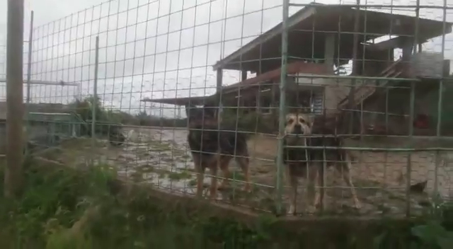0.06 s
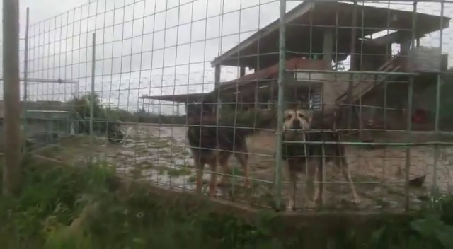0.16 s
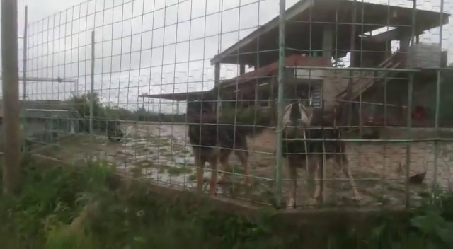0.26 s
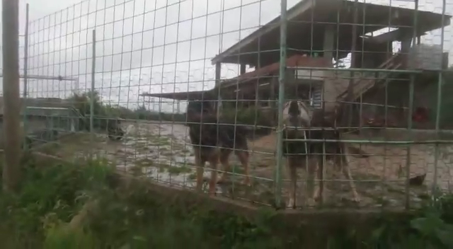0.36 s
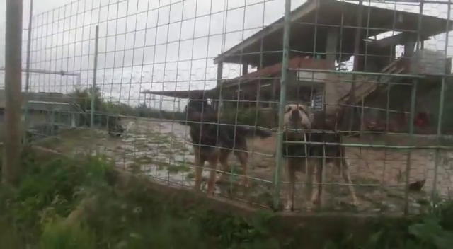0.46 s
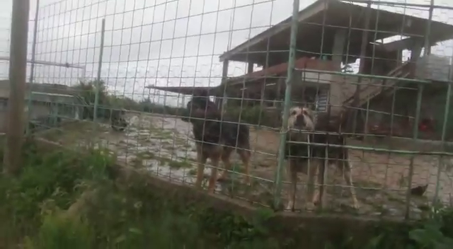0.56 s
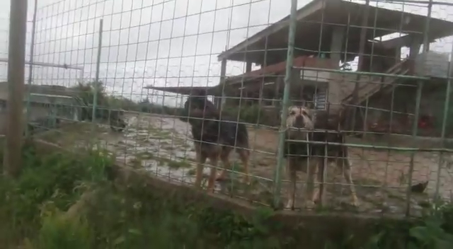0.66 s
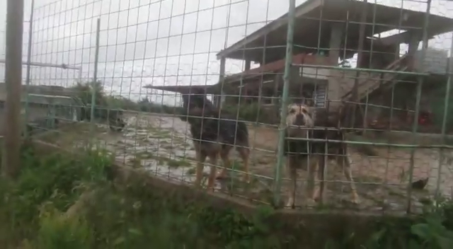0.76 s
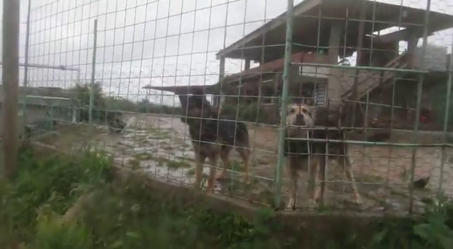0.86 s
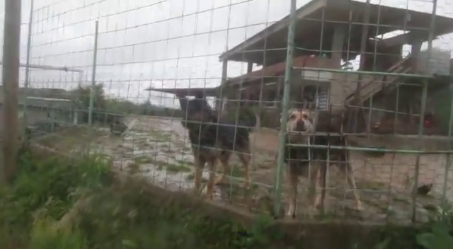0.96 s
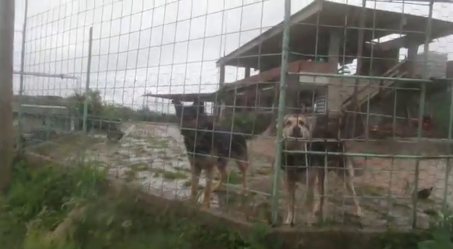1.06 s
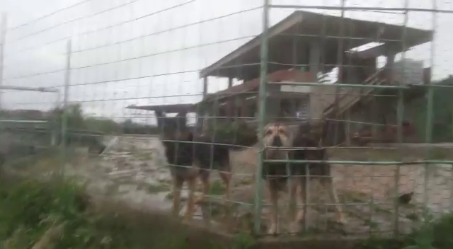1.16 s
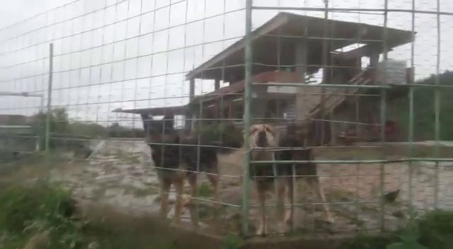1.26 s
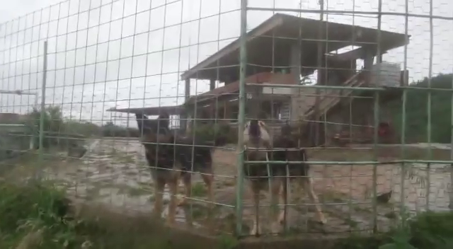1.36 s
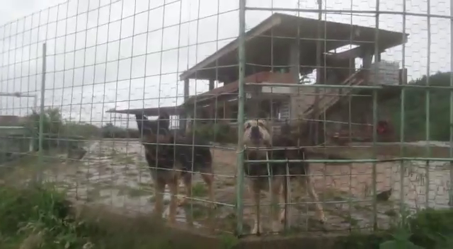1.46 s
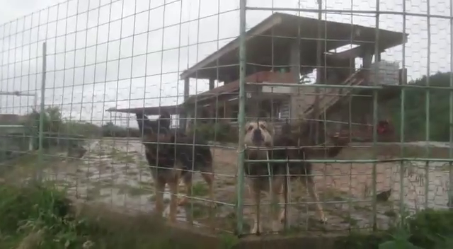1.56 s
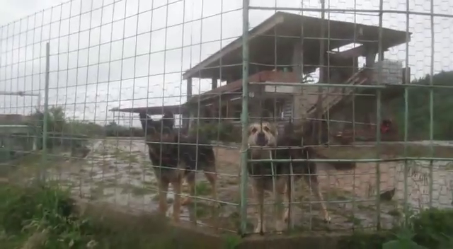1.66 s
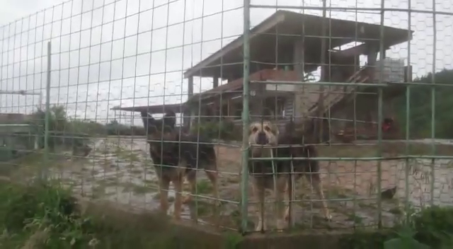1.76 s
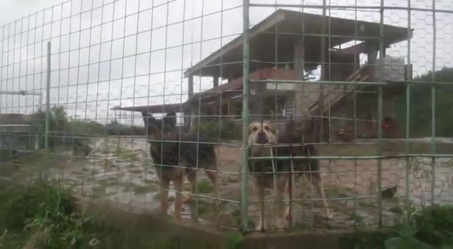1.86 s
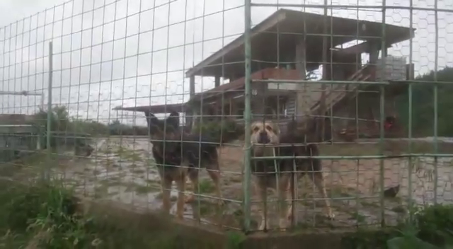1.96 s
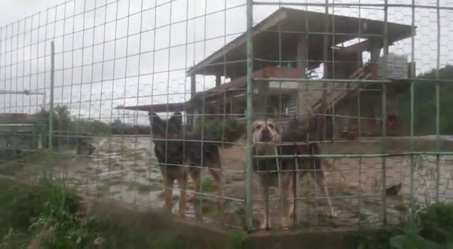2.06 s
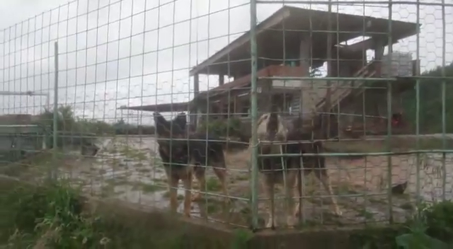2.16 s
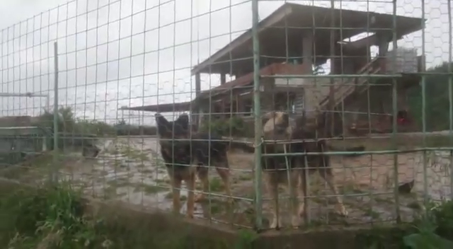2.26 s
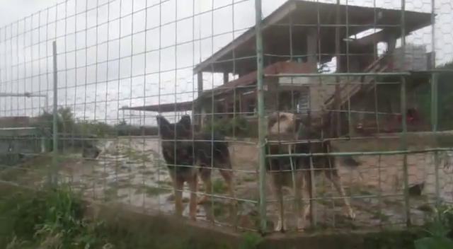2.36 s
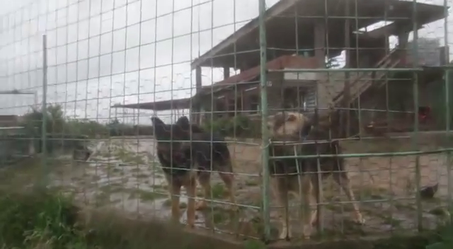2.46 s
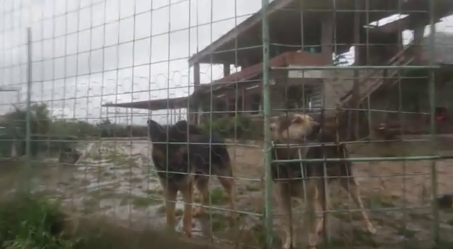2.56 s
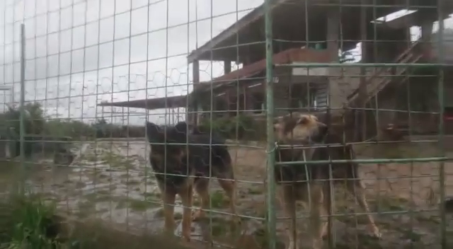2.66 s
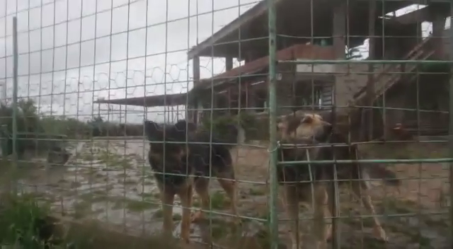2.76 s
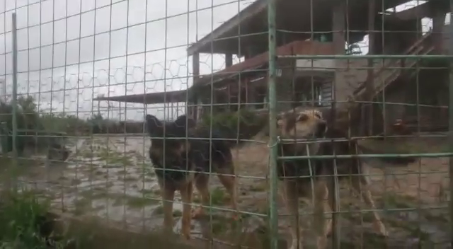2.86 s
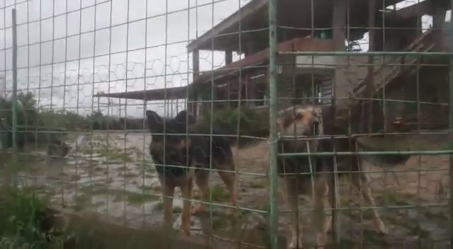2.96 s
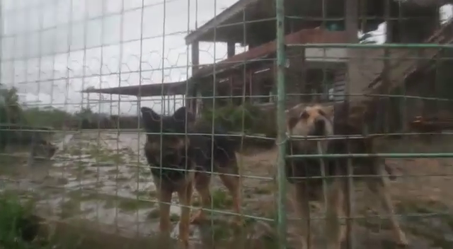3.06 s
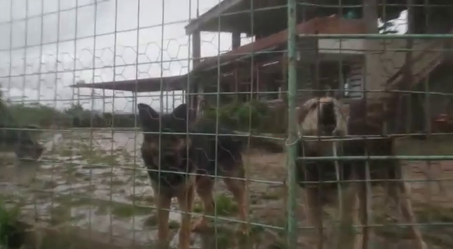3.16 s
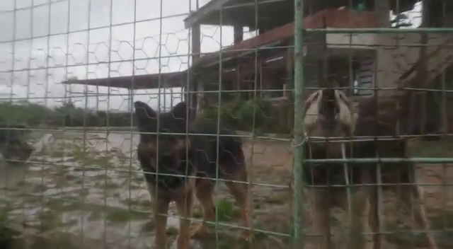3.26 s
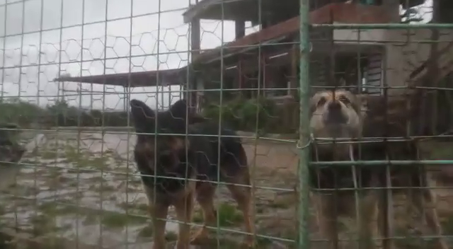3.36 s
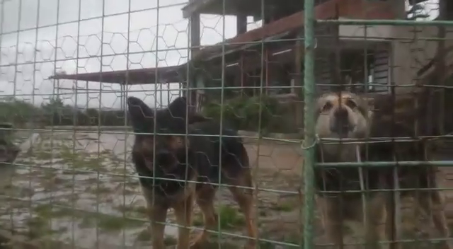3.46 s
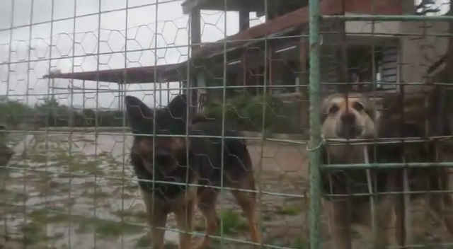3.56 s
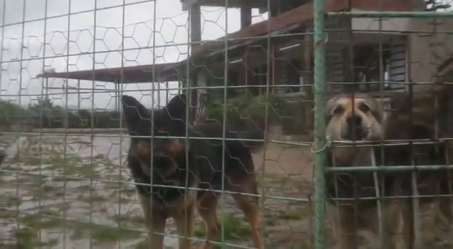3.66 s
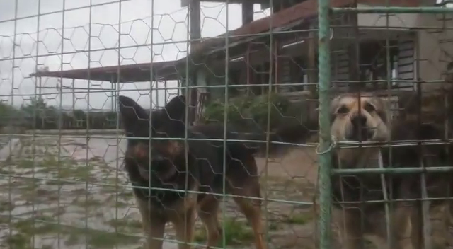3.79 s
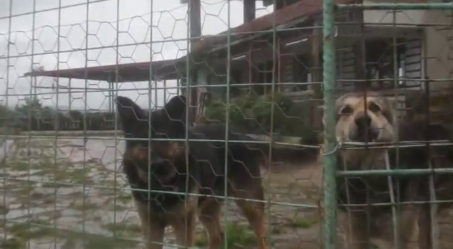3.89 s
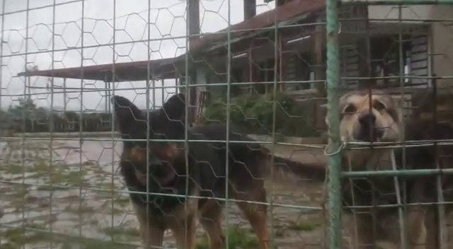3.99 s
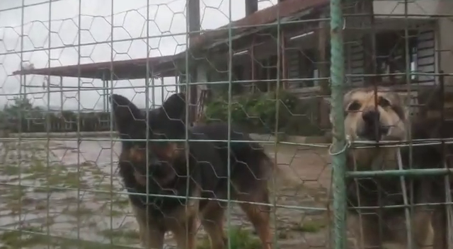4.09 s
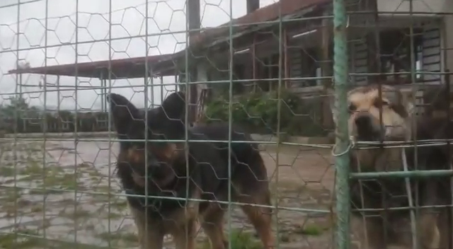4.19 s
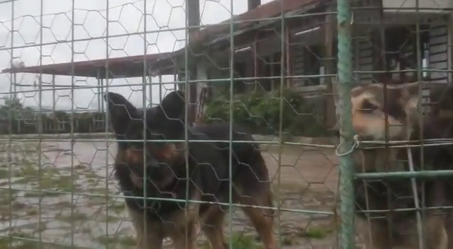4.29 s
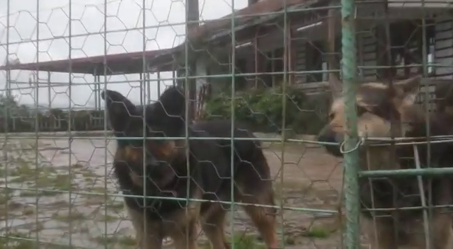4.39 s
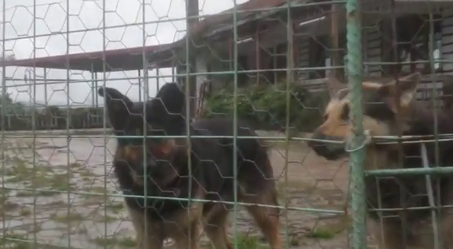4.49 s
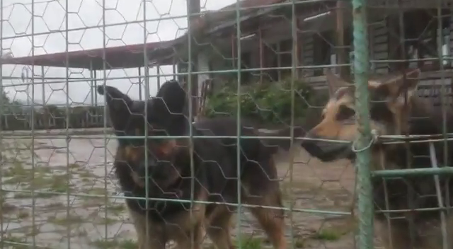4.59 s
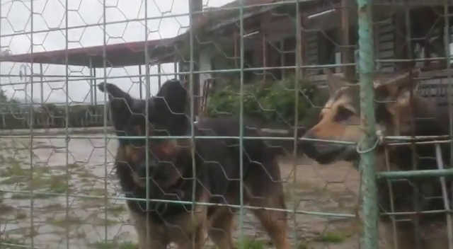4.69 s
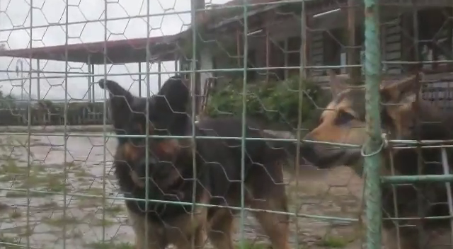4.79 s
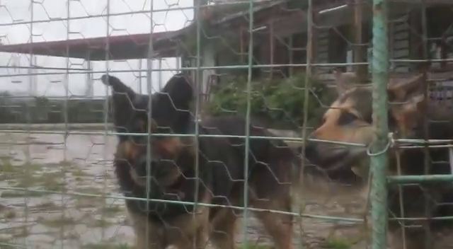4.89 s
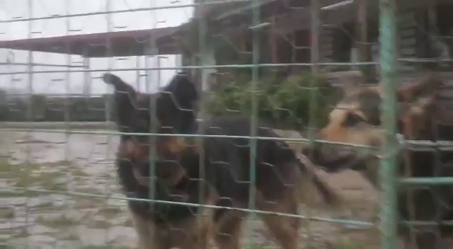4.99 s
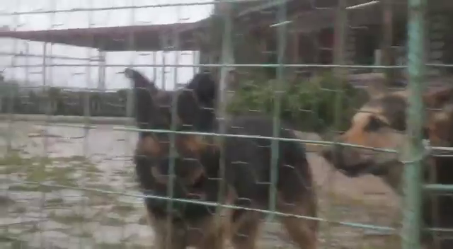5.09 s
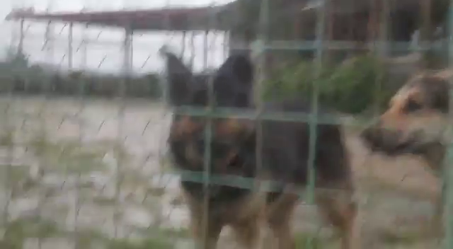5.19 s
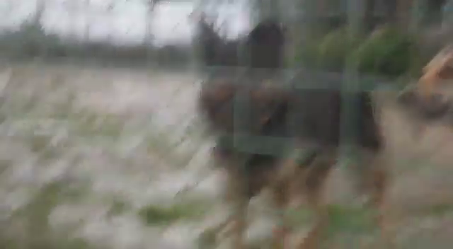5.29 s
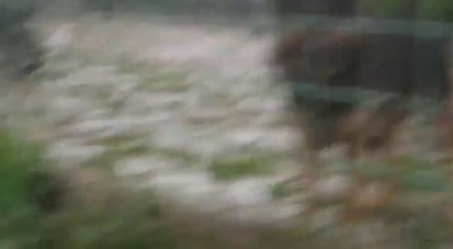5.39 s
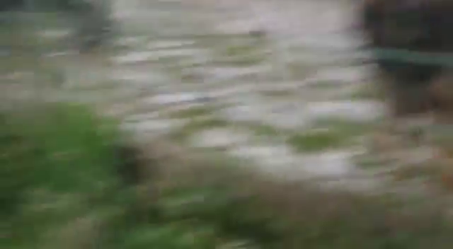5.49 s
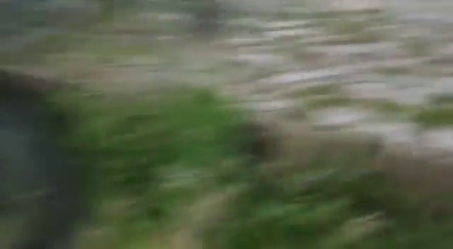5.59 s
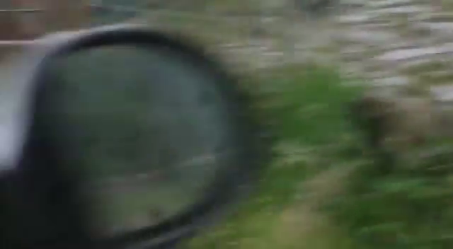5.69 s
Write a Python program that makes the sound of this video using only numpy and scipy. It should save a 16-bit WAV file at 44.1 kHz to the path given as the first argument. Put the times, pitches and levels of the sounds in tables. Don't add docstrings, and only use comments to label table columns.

```python
import sys
import numpy as np
from scipy import signal
from scipy.fft import rfft, irfft, next_fast_len
from scipy.io import wavfile
from scipy.ndimage import uniform_filter1d

SR = 44100
rng = np.random.default_rng(int(sys.argv[2]) if len(sys.argv) > 2 else 0)


def master_out(mix):
    frames = np.transpose(np.atleast_2d(mix))
    ceiling = np.clip(frames, -1, 1)
    pcm = np.round(ceiling * 32767).astype(np.int16)
    wavfile.write(sys.argv[1], SR, pcm)


def rack_gain(trim_db):
    fader = np.asarray(trim_db, float)
    return 10 ** (fader / 20)


N = 253134

# t/s, level/dB
BREEZE = [(0, -72.5), (4.3, -64.5), (4.8, -53), (5.74, -48.5)]
# t/s, half length/s,
# level/dB
GUSTS = [
    (0.046, .03, -50.5),
    (4.93, 0.078, -44.5),
    (5.063, .015, -42),
    (5.173, .03, -33.5),
    (5.304, 0.08, -39),
    (5.407, 0.04, -45),
    (5.655, .07, -52),
]
# t/s, peak level/dB, thump level/dB, ring/s, left over right/dB
TICKS = [
    (0.0576, -27, -6, 0.053, -9),
    (1.046, -36, -30, .004, 17),
    (1.1143, -19, -49, 0.0057, 19.5),
    (1.21, -38, -16, .004, 13),
    (1.995, -43, -14, 0.015, 14),
    (2.607, -40.5, -3, 0.0073, -6),
    (3.149, -38, -23.5, 0.0048, -1),
    (5.7118, -14.5, -1.5, 0.0018, -3),
]

# t/s, firing rate/Hz
FIRING_RATE = [(0.0, 27.2), (0.49, 27.2), (0.75, 50.5), (0.94, 72.5), (0.99, 72.9), (1.25, 64.7),
               (1.68, 49.6), (2.25, 32.0), (2.32, 33.9), (2.49, 45.9), (2.72, 43.2), (2.84, 59.3),
               (3.01, 76.0), (3.1, 74.3), (3.71, 52.3), (4.4, 31.4), (5.0, 28.3), (5.74, 27.4)]
# t/s, load level/dB, facing level/dB
LOAD = [(0, -63, 4.4), (.45, -51, -0.5), (.72, -41.5, 1.5), (1.05, -37, 2), (1.3, -38.5, 1.5),
        (1.45, -38.5, 2.5), (1.65, -45.5, -3), (1.9, -50, -5), (2.15, -51.5, -5.5), (2.5, -44.5, -6.5),
        (2.76, -46, -3.5), (3.01, -38, -4.5), (3.25, -33, -3.5), (3.45, -33.5, -8), (3.7, -42, -9.5),
        (4.09, -51, -7), (4.3, -49, -1), (4.65, -43, 1.1), (5.15, -42, 2.5), (5.74, -44, 5.5)]
# f/Hz, level/dB
NOTE = [(27, 6), (33, -5.5), (44, -1), (54, -5), (62, -6), (73, 1.9)]
# f/Hz, level/dB
EXHAUST = [(55, -2), (85, -3.5), (120, -4), (150, -4), (185, -8.5), (215, -20), (350, -28), (500, -36)]
# f/Hz, level/dB per Hz
REVVED_RUMBLE = [(120, -18), (200, 2.5), (281, -12), (337, 2), (399, -6.5), (490, 3.5), (561, -9),
                 (635, -7), (736, -11), (1820, -27), (3000, -37.5), (3900, -58), (6600, -120)]
# f/Hz, level/dB per Hz
IDLE_RUMBLE = [(120, -46), (200, -4.5), (269, -10.5), (333, -1), (518, -1), (770, -3.5), (1000, -8),
               (1340, -8.5), (1610, -22.5), (3000, -38.5), (3900, -51), (6600, -120)]
# f/Hz, level/dB per Hz
HISS = [(1500, 4.5), (2500, -2.5), (4800, -7.5), (7420, -3.5), (8400, -4.5), (11200, -15), (15800, -14.5),
        (17000, -9)]
# t/s, f/Hz
TURBO = [(0, 5500), (.7, 5800), (.8, 6600), (1.0, 10800), (1.1, 11000), (1.85, 8800), (2.15, 7400),
         (2.35, 7000), (2.48, 7700), (2.68, 7300), (2.85, 9000), (2.95, 11000), (3.02, 13000), (3.8, 9300),
         (4.3, 7700), (5.74, 5000)]
# f/Hz, width/Hz, level/dB
SPOOLING = [(9000, 6000, -73)]
# f/Hz, width/Hz, level/dB
COASTING = [(7900, 2000, -79)]
# start t/s, end t/s, f/Hz, width/Hz, level/dB
SQUEAKS = [
    (.9, 2.2, 1690, 15, -70),
    (4.125, 4.155, 2240, 120, -64),
    (4.15, 4.45, 2190, 130, -67),
    (4.3, 4.8, 2360, 130, -63),
    (4.68, 4.715, 775, 25, -45),
    (4.38, 4.85, 183, 10, -51),
    (.85, 1.2, 1550, 50, -62),
    (4.3, 5.0, 1900, 250, -63),
    (5.33, 5.38, 1250, 60, -50),
    (2.85, 3.0, 6600, 300, -70),
]
RUMBLE_DB, RUMBLE_FOLLOWS, RUMBLE_FACING = -47, 0.81, 0.24
HISS_DB, HISS_FOLLOWS, NOTE_FACING = -53.5, 0.58, 0.6

# delay t/s, level/dB
ECHOES = [
    (.075, -61.5),
    (0.111, -26.5),
    (.145, -32),
]
WALL_TILT, WALL_CUT_HZ = 0.27, 4600

# snap t/s, top pitch f/Hz, level/dB, opening level/dB, breath level/dB
BARKS = [
    (0.487, 457.8, -15.5, -2.4, -37.5),
    (1.493, 424.1, -16.5, 6.3, -32),
    (2.334, 424.2, -16, -16, -37),
    (3.387, 429.1, -14.5, 3.2, -35.5),
]
FIRST_BARK = [(-.131, .69, -29, -26, -5, 12.5), (-.097, .7, -5.5, -6, 1.5, 6),
              (-.068, .825, -4.5, 5.5, 8, -32), (-.05, .875, -4.5, 8, 2, -22.5),
              (-.035, .925, 1, 1.5, -0.5, -36), (-.022, 1.0, 8.5, -27, -17.5, -6.5),
              (-.002, 0.97, 2.5, 0, -7.5, -18), (.015, .89, -16.5, -11, 2, 18.5),
              (.043, 0.69, -30.5, -10, 14, 14)]
# t/s, pitch as share of top, effort level/dB,
# mouth opening as octave gain/dB, fold pressing as overtone gain/dB, hoarseness level/dB
BARK = [(-.125, .645, -31, 8.5, -17, 4.5), (-.104, .665, -16.5, 3.5, -2, 18.5),
        (-.08, .78, -4, -18, 5, -3.5), (-.06, .85, -5.5, 11, -5.5, -28.5),
        (-.037, .94, -2, 8.5, -1.5, -21.5), (-.017, 1.0, -1.4, 8, -10.5, -7.5),
        (-.003, .925, -4, 8.5, -1, -1.5), (.016, .65, -18, 7.5, 9.5, 0.5), (0.044, .5, -48.5, 24, -1, 38)]
# f/Hz, width/Hz, level/dB
THROAT = [(430, 60, 28), (763, 170, 11.5), (1284, 200, -3.5), (1560, 240, -19.5), (1793, 370, -19),
          (2080, 170, -20.5), (2460, 73, -22.5)]
# f/Hz, width/Hz, level/dB
HOARSE = [(430, 110, 5.5), (820, 210, -4), (1310, 100, -9), (1820, 850, -30), (2095, 250, -18.5),
          (2410, 340, -36)]
# f/Hz, width/Hz, level/dB
BREATH = [(3910, 1200, -7), (4664, 290, 1), (5410, 450, -8), (6090, 390, -2), (7550, 1300, -15.5),
          (8010, 1000, -5), (10200, 5600, -11.5), (14200, 2500, -20)]
OPENING_S, OPENING_RAMP_S = 0.058, 0.078
SNAP_S, SNAP_DB = 0.004, -0.5
BREATH_FOLLOWS, BREATH_PER_PRESSING, BREATH_LAG_S = 0.8, 0.64, 0.01

DUCK_DB, DUCK_AT_DB, RECOVER_DB_PER_S, DUCK_BELOW_HZ = -8, -5.5, 12.5, 294
# f/Hz, level/dB
SIDE_DB = [(30, -30), (150, -24), (300, -16), (600, -14), (1200, -5), (2500, -6), (6000, -2), (15000, -4)]
MONO_FROM_S = 1.935


def rms_one(x):
    return x / np.sqrt(np.mean(x ** 2) + 1e-20)


def in_time(rows):
    s, *columns = np.transpose(rows)
    return [np.interp(np.arange(N) / SR, s, c) for c in columns]


def at_hz(points, hz):
    point_hz, db = np.array(points)[:, :2].T
    return np.interp(np.log(hz), np.log(point_hz), db)


def peaks(modes, hz):
    power = sum(rack_gain(db) ** 2 / (1 + (2 * (hz - top) / width) ** 2) ** 2 for top, width, db in modes)
    return np.sqrt(power)


def shaped(x, gain):
    size = next_fast_len(x.shape[-1])
    hz = np.fft.rfftfreq(size, 1 / SR) + 1
    return irfft(rfft(x, size) * gain(hz), size)[..., :x.shape[-1]]


def noise(gain):
    return rms_one(shaped(rng.standard_normal(N), gain))


def drift(rate_hz):
    slow = shaped(rng.standard_normal(N // 32 + 2), lambda hz: 1 / (1 + (hz / 32 / rate_hz) ** 2))
    return np.interp(np.arange(N) / 32, np.arange(len(slow)), rms_one(slow))


def wind():
    t = np.arange(N) / SR
    gusts = sum(rack_gain(db) * np.exp(-((t - s) / half) ** 2) for s, half, db in GUSTS)
    level = rack_gain(in_time(BREEZE)[0]) + gusts
    lumps = rack_gain(2.6 * drift(40))
    return level * lumps * noise(lambda hz: hz / (hz + 120) / (1 + (hz / 290) ** 4))


def ticks():
    out, t = np.zeros((2, N)), np.arange(2000) / SR
    cavity = [(8330, 1700, -9.5), (12900, 16000, -24.5)]  # f/Hz, width/Hz, level/dB
    for s, db, thump_db, ring_s, pan_db in TICKS:
        knock = rng.standard_normal(len(t)) + 5.7 * (t == t[3])
        burst = shaped(knock, lambda hz: peaks(cavity, hz)) * rack_gain(-60 * t / ring_s)
        thump = rack_gain(thump_db) * np.sin(2 * np.pi * 1200 * t) * rack_gain(-60 * t / 0.0028)
        burst = burst / np.abs(burst).max() + thump
        sides = rack_gain(db + np.array([[pan_db], [-pan_db]]) / 2)
        at = round(s * SR)
        out[:, at:at + len(t)] += (sides * burst)[:, :N - at]
    return out


def turbo():
    hz, = in_time(TURBO)
    speeding_up = np.clip(np.gradient(np.log(hz)) * SR / 1.5, 0, 1)
    spooling = uniform_filter1d(speeding_up, size=2000)
    level = spooling * peaks(SPOOLING, hz) + peaks(COASTING, hz)
    flutter = level * rack_gain(6.0 * drift(40))
    return flutter * np.sin(2 * np.pi * np.cumsum(hz * (1 + 0.02 * drift(200))) / SR)


def squeaks():
    out, t = np.zeros(N), np.arange(N) / SR
    for start, end, hz, width, db in SQUEAKS:
        swell = np.sin(np.pi * np.clip((t - start) / (end - start), 0, 1)) ** 0.5
        tone = noise(lambda f: peaks([(hz, width, 0)], f))
        out += rack_gain(db) * swell * rack_gain(2.4 * drift(16)) * tone
    return out


def engine():
    rate, = in_time(FIRING_RATE)
    orders_db, facing_db = in_time(LOAD)
    note_db = orders_db + at_hz(NOTE, rate) + NOTE_FACING * facing_db
    rumble_db = RUMBLE_DB + RUMBLE_FOLLOWS * (orders_db + 40) + RUMBLE_FACING * facing_db
    hiss_db = HISS_DB + HISS_FOLLOWS * (orders_db + 40) + facing_db
    turn = 2 * np.pi * np.cumsum(rate * (1 + 0.00485 * drift(7.96))) / SR
    note = rack_gain(np.minimum(note_db, -32) + 2.5) * np.cos(turn)

    orders = np.zeros(N)
    for k in range(2, 12):
        level = rack_gain(at_hz(EXHAUST, k * rate) + 2.0 * drift(10))
        orders += level * np.cos(k * turn - 0.5 * k * k + 0.07 * k * drift(6))
    orders = rack_gain(orders_db + 3) * orders
    orders = orders + rack_gain(orders_db - 11) * noise(lambda hz: peaks([(103, 150, 0)], hz))

    revved = np.clip((rate - 30) / 12, 0, 1)
    rumble = np.sqrt(revved) * noise(lambda hz: rack_gain(at_hz(REVVED_RUMBLE, hz)))
    rumble = rumble + np.sqrt(1 - revved) * noise(lambda hz: rack_gain(at_hz(IDLE_RUMBLE, hz)))
    rumble = rack_gain(rumble_db + 1.5) * (1 + 0.15 * np.cos(turn - 1.2)) * rumble
    hiss = rack_gain(hiss_db + 0.4 * drift(30)) * (1 + 0.11 * np.cos(turn))
    hiss = hiss * noise(lambda hz: rack_gain(at_hz(HISS, hz)))
    return note + orders + rumble + hiss + turbo() + squeaks()


def yard(x, tail_db, t60):
    t = np.arange(SR // 2) / SR
    shape = rack_gain(tail_db - 60 * t / t60) * np.clip(t / 0.022, 0, 1)
    shape = shape + sum(rack_gain(db - 27) * np.exp(-((t - delay) / 0.0056) ** 2) for delay, db in ECHOES)
    walls = shaped(shape * rng.standard_normal(len(t)),
                   lambda hz: (hz / 800) ** WALL_TILT / (1 + (hz / WALL_CUT_HZ) ** 4))
    scatter = rack_gain(3.0 * drift(40))
    return scatter * signal.fftconvolve(x, walls)[:N]


def ducking(bark):
    loud = np.sqrt(uniform_filter1d(bark ** 2, size=1500) + 1e-12) / rack_gain(DUCK_AT_DB)
    ramp = RECOVER_DB_PER_S * np.arange(N) / SR
    return rack_gain(ramp - np.maximum.accumulate(ramp - DUCK_DB * np.clip(loud, 0, 1)))


def barks():
    rows, gate, t = [], 0, np.arange(N) / SR
    shapes = [FIRST_BARK, BARK, BARK, BARK]
    for shape, (snap, top_hz, level_db, opening_db, breath_db) in zip(shapes, BARKS):
        *cry, closing, end = shape
        share_at_snap = np.interp(SNAP_S, *np.transpose(shape)[:2])
        let_go = (SNAP_S, share_at_snap, closing[2] + SNAP_DB, *closing[3:])
        s, share, effort, mouth, pressing, hoarse = np.transpose([*cry, let_go, closing, end])
        effort = effort + opening_db * np.clip((-s - OPENING_S) / OPENING_RAMP_S, 0, 1)
        db = level_db + effort
        air_db = breath_db + BREATH_FOLLOWS * effort + BREATH_PER_PRESSING * pressing
        rows += zip(snap + s, top_hz * share, db, db + mouth, db + pressing, db + hoarse, air_db)
        gate = gate + ((t > snap + s[0]) & (t < snap + s[-1]))
    return *in_time(rows), gate


def dog():
    pitch, first_db, octave_db, over_db, hoarse_db, breath_db, sounding = barks()
    turn = 2 * np.pi * np.cumsum(pitch * (1 + 0.0093 * drift(71.0))) / SR
    over = np.zeros(N)
    for k in range(3, 10):
        shimmer = rack_gain(0.3 * k * drift(40))
        over += peaks(THROAT, k * pitch) * shimmer * np.cos(k * turn + 0.354 * k * k)
    voice = rack_gain(first_db) * np.cos(turn) + rack_gain(octave_db) * np.cos(2 * turn) + rack_gain(over_db + 1) * over
    voice = np.sqrt(2) * voice
    puffs = 1 + 0.27 * np.cos(turn)
    hoarse = rack_gain(np.minimum(hoarse_db, -18)) * noise(lambda hz: peaks(HOARSE, hz))

    white, air = rng.standard_normal(N), np.zeros(N)
    for mode in BREATH:
        air += rack_gain(2.5 * drift(25)) * shaped(white, lambda hz: peaks([mode], hz))
    lag = np.exp(-1 / (BREATH_LAG_S * SR))
    stream = signal.lfilter([1 - lag], [1, -lag], sounding * rack_gain(breath_db))
    breath = stream * rack_gain(1.0 * drift(64)) * rms_one(air)
    rasp = rack_gain(over_db - 17) * noise(lambda hz: peaks(THROAT[2:], hz))

    gate = uniform_filter1d(sounding * 1.0, size=300)
    bark = gate * (voice + puffs * (hoarse + rasp)) + puffs * breath
    return shaped(bark, lambda hz: 1 / (1 + (190 / hz) ** 8))


def scene():
    bark, motor = dog(), engine()
    bass = shaped(motor, lambda hz: 1 / (1 + (hz / DUCK_BELOW_HZ) ** 4))
    motor = motor - (1 - ducking(bark)) * bass
    mid = bark + yard(bark, tail_db=-47.5, t60=0.25) + motor + wind()
    turns = np.cumsum(rng.normal(0, 1.5, 1200))
    turns_hz = np.linspace(0, SR / 2, len(turns))
    side = shaped(mid, lambda hz: rack_gain(at_hz(SIDE_DB, hz)) * np.exp(1j * np.interp(hz, turns_hz, turns)))
    low_pass = signal.butter(1, 700, fs=SR, output="sos")
    lean = signal.sosfilt(low_pass, rack_gain(-12) * motor + rack_gain(-24) * bark)
    return mid + (side - lean) * [[1], [-1]] + ticks()


def band_limit(x):
    return signal.sosfilt(signal.butter(12, 16900, fs=SR, output="sos"), x)


def record(dry):
    mid, side = (dry[0] + dry[1]) / 2, (dry[0] - dry[1]) / 2
    side = side * np.clip((MONO_FROM_S - np.arange(N) / SR) / 0.049, 0, 1)
    both = shaped(mid + side * [[1], [-1]], lambda hz: 1 / (1 + (hz / 15950) ** 500))
    mix = 1.647 * np.tanh(both / 1.433)
    return band_limit(mix)


dry = scene()
out = record(dry)
master_out(out)
```